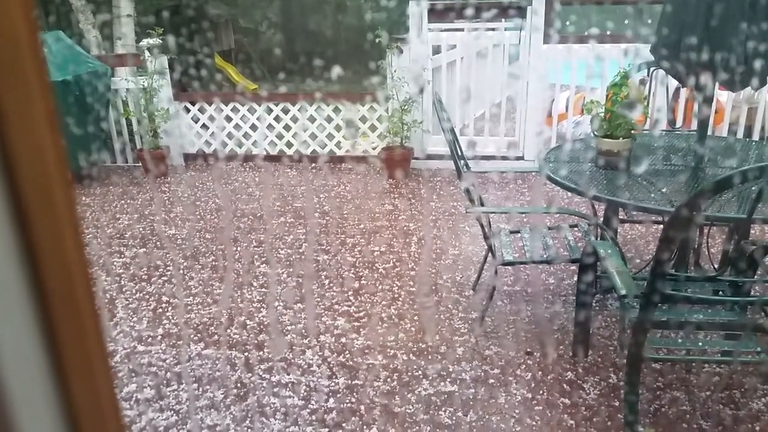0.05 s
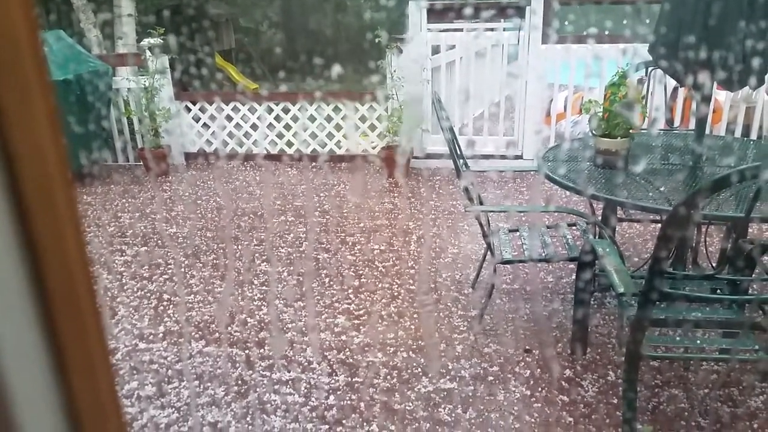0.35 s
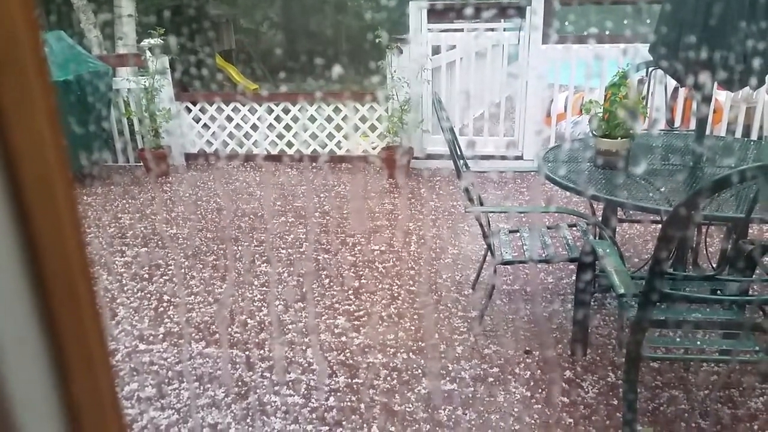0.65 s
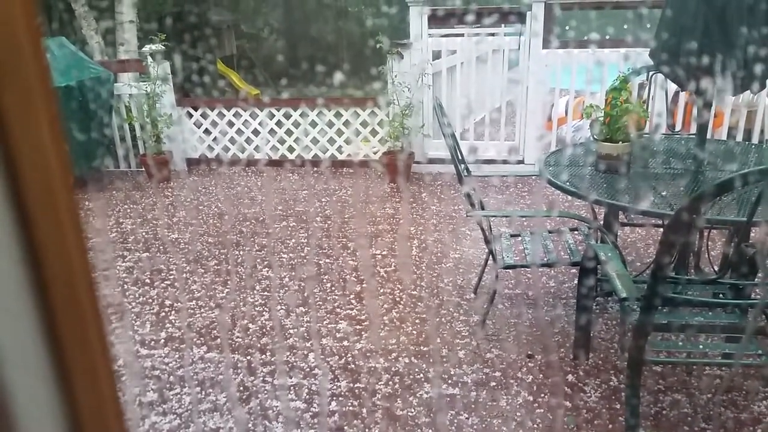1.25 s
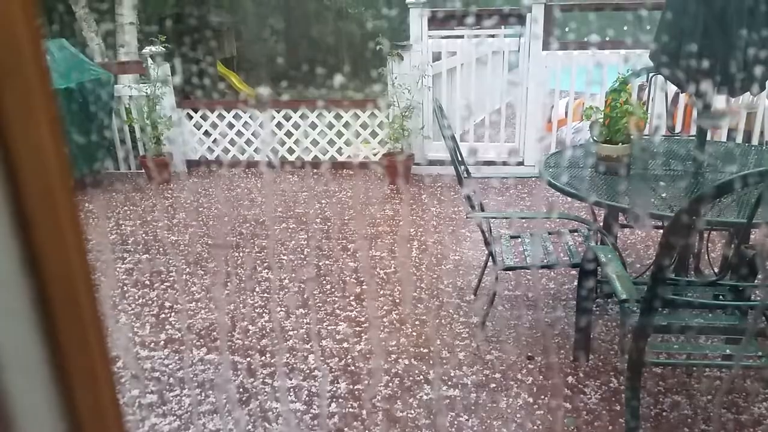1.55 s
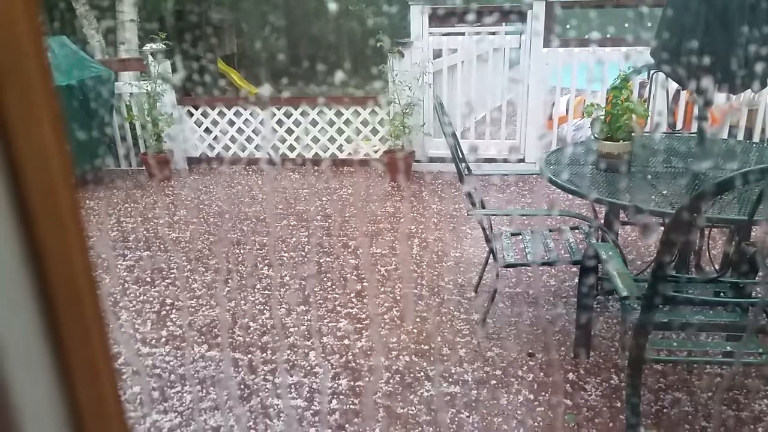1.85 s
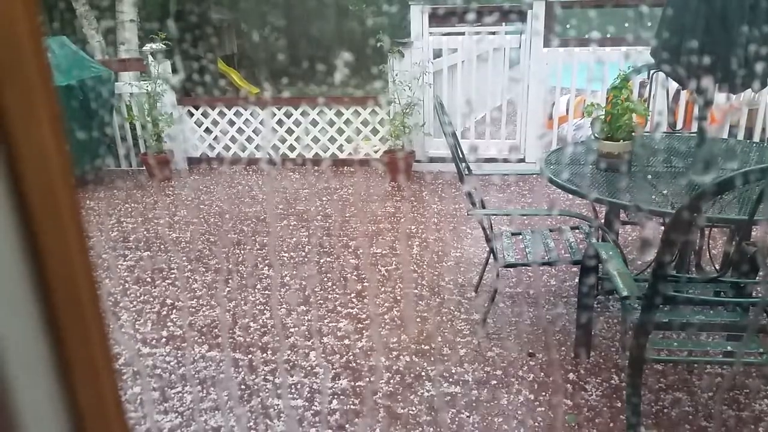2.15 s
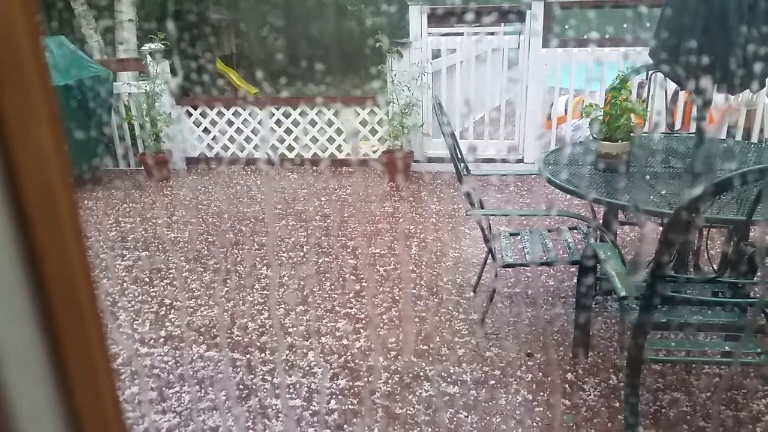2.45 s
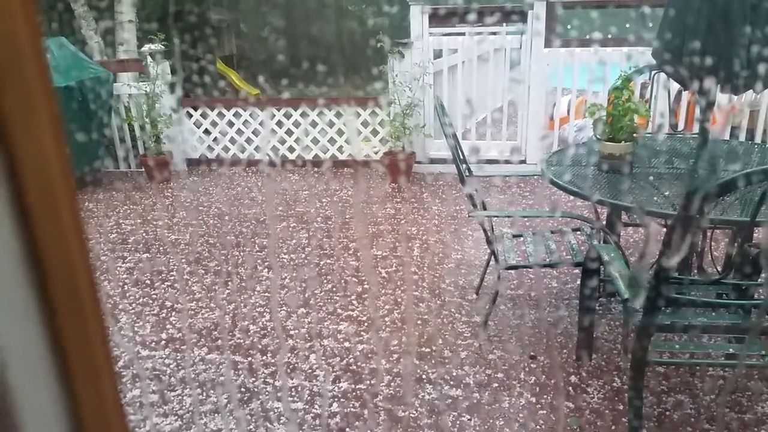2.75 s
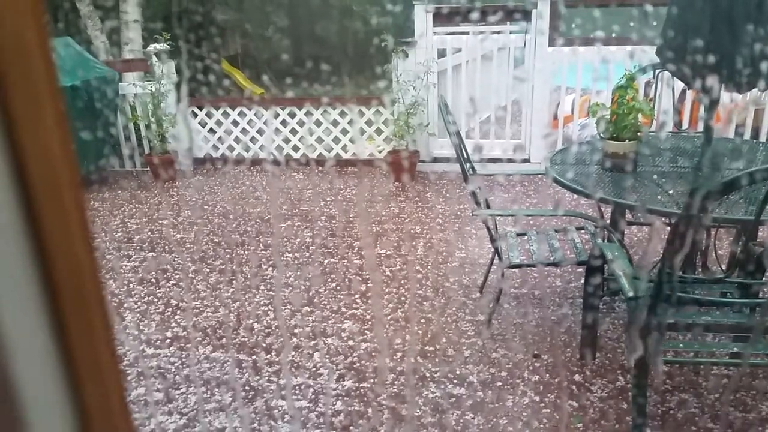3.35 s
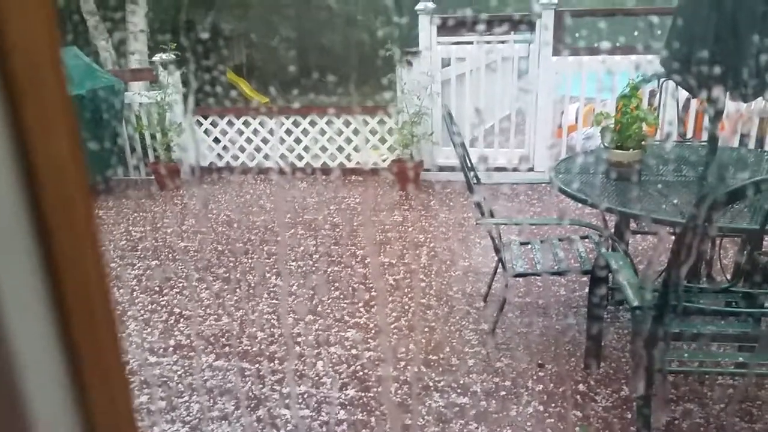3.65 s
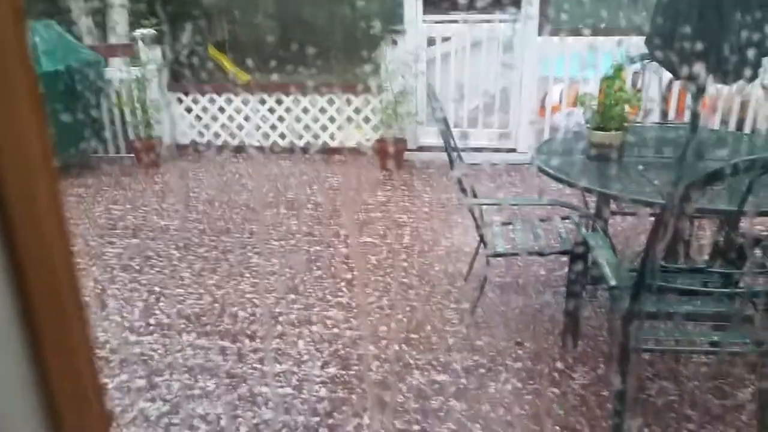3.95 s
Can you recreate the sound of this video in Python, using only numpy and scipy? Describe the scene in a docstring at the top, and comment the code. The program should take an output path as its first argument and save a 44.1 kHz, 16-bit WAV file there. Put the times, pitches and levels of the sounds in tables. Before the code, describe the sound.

Hail and rain pound a roof and deck, heard indoors behind a glass door. Heavy stones thump through a steady rumble while nearer ones clack on the wall and glass. The faintly hissing microphone is bumped at the end.

```python
"""Hail and rain beat on a house and its deck, heard from indoors behind a glass door.
Countless blows merge into a roof rumble and a muffled patter; heavy stones thump and ring the boards.
Nearer stones clack on the wall and glass, and a few knock on the wooden frame.
The microphone hisses, mostly on the left, and is bumped at the very end."""
import sys
import numpy as np
from scipy import signal
from scipy.fft import rfft, irfft
from scipy.io import wavfile
from scipy.ndimage import uniform_filter1d

SR = 44100
rng = np.random.default_rng(int(sys.argv[2]) if len(sys.argv) > 2 else 0)


def store_pcm(level_fs):
    """Save levels as 16-bit WAV."""
    pcm = np.round(np.clip(level_fs, -1, 1) * 32767).astype(np.int16)
    wavfile.write(sys.argv[1], SR, np.atleast_2d(pcm).T)


N = 176400  # 4 seconds

# Levels in the tables are relative. A "tone" says how strong each frequency is.
# tone of the left microphone's hiss: f/Hz, level/dB
HISS_TONE = [(1500, -40), (2400, -20), (2750, -14), (3100, -12.5), (3550, -3.5), (3850, -2), (4350, 0.5),
             (4700, -5), (5200, -14.5), (5900, -28), (6400, -48.5), (7200, -67)]
# tone of the bump on the microphone: f/Hz, level/dB
BUMP_TONE = [(20, -35), (60, -3), (110, 1.5), (170, -0.5), (260, -4), (350, -5.5), (500, -18), (700, -29),
             (1400, -41), (3000, -52), (6000, -79), (9000, -100)]
# strength of the shower over time: t/s, level/dB
SHOWER_STRENGTH = [(0, 0.5), (.36, 0.5), (.48, 3.5), (.66, 2), (.9, 0), (1.1, 1), (1.3, 0.5), (1.62, 0),
                   (1.76, 3), (1.9, -1), (2.2, 0), (2.6, -0.5), (2.8, .5), (3.02, -5.5), (3.14, 2),
                   (3.32, -0.5), (3.55, -4.5), (4, -4)]
# tone of the deck's patter through the glass: f/Hz, level/dB
PATTER_TONE = [(200, -9), (500, 3.5), (750, 3.5), (1000, -2.5), (1600, -7.5), (1900, -12.5), (2400, -19.5),
               (3200, -18), (4300, -21.5), (5300, -31), (6400, -48.5), (8000, -62.5)]
# stones hitting the wooden frame: t/s, level/dB
FRAME_HITS = [(2.403, -24.5), (2.432, -41), (2.881, -35)]
# notes at which the frame rings: f/Hz, level/dB, time to fade by 60 dB/s
FRAME_NOTES = [(850, -19, 0.027), (1216, -6, .022), (1330, -10, .025), (1520, -8, 0.012), (1593, 0, 0.024),
               (1840, -10, 0.017), (2540, -21, 0.017)]
# tone of a knock's echo in the room: f/Hz, level/dB
ECHO_TONE = [(400, -15), (850, -6), (1050, -9), (1250, 2), (1620, 0), (2000, -9), (2600, -21), (3500, -34),
             (7000, -82)]
# near hailstones: t/s, clack level/dB, crack level/dB, sizzle level/dB, time to fade by 60 dB/s
NEAR_HITS = [(.376, -53, -65, -65, 0.14), (.438, -45, -60, -71, 0.23), (.483, -56, -55, -75, .14),
             (.53, -56, -75, -83, 0.12), (.58, -52, -77, -84, 0.18), (0.646, -57, -68, -79, 0.092),
             (.707, -58, -62, -59, 0.11), (0.749, -46.5, -62.5, -60, 0.21), (0.952, -42, -49.5, -82, 0.12),
             (0.967, -42.5, -63, -85, 0.064), (1.03, -47, -60, -72, 0.22), (1.149, -50, -70, -88, 0.077),
             (1.488, -42, -65, -86, 0.051), (1.569, -49.5, -65, -71, 0.13), (1.68, -54, -67, -74, 0.36),
             (1.71, -48, -63.5, -68, 0.16), (1.755, -55, -63, -77, 0.37), (2.095, -44.5, -58.5, -62, 0.28),
             (2.167, -53, -70, -64, 0.069), (2.329, -63, -67, -67, .12), (2.684, -54, -64, -66, .11),
             (2.768, -46, -64, -77, 0.31), (2.848, -58, -62, -64, 0.12), (3.092, -50, -62, -75, .2),
             (3.118, -46.5, -75, -80, 0.17), (3.244, -53, -69, -75, .2), (3.29, -51, -69, -79, 0.37),
             (3.464, -51.5, -78, -82, 0.18)]
# tone of a stone's low clack: f/Hz, level/dB
CLACK_TONE = [(150, -13), (400, 6), (800, 2), (1300, -1.5), (1700, -6.5), (2200, -10.5), (3200, -27.5),
              (6000, -56), (9000, -84.5)]
# tone of its sharp crack: f/Hz, level/dB
CRACK_TONE = [(1000, -18.5), (2000, -0.5), (2700, 2.5), (3200, -7), (4100, -2.5), (5200, -13.5),
              (6400, -27.5), (8000, -42.5), (14000, -59)]
# tone of its high sizzle, and of the faint high hiss: f/Hz, level/dB
SIZZLE_TONE = [(3000, -42.5), (7000, -25.5), (9300, -23), (11200, -11), (13000, -4.5), (15500, -1.5)]
# heavy stones on the roof: t/s, thump level/dB, hollow ring level/dB
HEAVY_HITS = [(0.127, -26.5, -49.5), (0.158, -27.5, -45), (0.215, -24.5, -48), (0.26, -28, -48),
              (0.369, -29.5, -44), (0.443, -31.5, -40), (0.533, -27.5, -41), (0.579, -25.5, -41),
              (0.669, -28.5, -47), (0.779, -32, -41.5), (0.969, -26.5, -39), (1.031, -26.5, -42.5),
              (1.148, -29.5, -41), (1.22, -29.5, -47), (1.379, -38, -45.5), (1.519, -32, -44.5),
              (1.55, -33, -45), (1.676, -29, -44), (1.871, -32, -49), (1.939, -33, -41.5),
              (2.089, -28.5, -44.5), (2.187, -26.5, -49), (2.25, -32, -47.5), (2.385, -35, -51),
              (2.549, -30.5, -47), (2.76, -36.5, -46), (3.091, -24, -40), (3.119, -31, -44),
              (3.465, -28.5, -41.5), (3.589, -33, -49)]
# tone of the boards' hollow ring: f/Hz, level/dB
BOARD_TONE = [(120, -20.5), (240, -2), (400, 0.5), (560, -4.5), (800, -9), (1200, -23), (3000, -60.5),
              (7000, -90)]
# tone of the rumbling roof and walls: f/Hz, level/dB
ROOF_TONE = [(12, -40), (20, -17.5), (54, -4), (107, 1.5), (210, -7.5), (236, -6), (266, -10.5), (369, -10),
             (505, -17.5), (700, -24.5), (910, -50), (1540, -120)]
# notes that the room boosts: f/Hz, width/Hz, boost/dB
ROOM_NOTES = [(62, 10, 3.5), (104, 3.7, 1.5), (122, 8.6, 1.5), (158, 18, 4), (191, 8.2, 2), (218, 5.3, 2),
              (252, 12, 4), (296, 52, 3.5), (381.3, 20, 3.5), (750, 48, 4)]
# how the rumble leans to one side: f/Hz, left minus right level/dB
ROOF_LEAN = [(30, -4), (65, -2), (120, -4.5), (220, -6.5), (380, -7), (700, -4)]


def gain(db):
    """Turn decibels into a number to multiply by."""
    return 10 ** (np.asarray(db) / 20)


def set_level(x, db):
    """Scale a sound to an average (rms) level."""
    return x * gain(db) / np.sqrt(np.mean(x ** 2))


def pan(db):
    """Left and right gains; positive dB leans left, negative leans right."""
    return gain(np.array([[1], [-1]]) * db / 2)


def frequencies():
    """The frequencies, in Hz, at which a tone is worked out."""
    return np.maximum(np.arange(N + 1) * SR / (2 * N), 1)


def curve(points):
    """Join a table's points into one dB value for every frequency."""
    hz, db = np.array(points).T
    return np.interp(np.log(frequencies()), np.log(hz), db)


def colour(x, db):
    """Filter a sound by a dB curve, so that ringing follows each hit and never comes before it."""
    cepstrum = irfft(np.log(gain(db)))  # the curve, laid out along time
    cepstrum[..., 1:N] *= 2
    cepstrum[..., N + 1:] = 0  # drop the part before the hit
    response = np.exp(rfft(cepstrum))
    return irfft(rfft(x, 2 * N) * response)[..., :N]


def ring(start, rise_s, fade_s):
    """Loudness shape of one blow: a quick rise, and a fall of 60 dB in fade_s."""
    shape = np.zeros(N)
    first = int(np.clip(start * SR, 0, N))
    age = np.arange(min(N - first, SR // 2)) / SR
    shape[first:first + len(age)] = np.minimum(age / rise_s, 1) * np.exp(-np.log(1000) * age / fade_s)
    return shape


def burst(shape, tone):
    """Separate noise for each ear, given a loudness shape and then a tone of the same power."""
    db = curve(tone)
    noise = shape * rng.standard_normal((2, N))
    return colour(noise, db) / np.sqrt(np.mean(gain(db) ** 2))


def impacts(per_second, spread_db):
    """Randomly timed clicks of uneven size."""
    happens = rng.random(N) < per_second / SR
    size = gain(spread_db * np.clip(rng.standard_normal(N), -2, 2))
    return happens * size * rng.choice([-1, 1], N)


def shower(follow=1):
    """Gain that swells and eases with the hail; a smaller follow makes it swing less."""
    return gain(follow * np.interp(np.arange(N) / SR, *np.array(SHOWER_STRENGTH).T))


def microphone_hiss():
    """A steady hiss on the left, and a faint high hiss on both sides that follows the shower."""
    left = set_level(colour(rng.standard_normal(N), curve(HISS_TONE)), -50)
    high = set_level(colour(rng.standard_normal((2, N)), curve(SIZZLE_TONE)), -72.5)
    return left * np.array([[1], [0]]) + high * shower(follow=0.33) * pan(-1.2)


def microphone_bump(at_s=3.983, rub_s=0.01):
    """One soft thud on the microphone's housing, inside a brief rub."""
    click = np.zeros(N)
    click[int(at_s * SR)] = -1
    thud = colour(click, curve(BUMP_TONE))
    thud *= gain(-13) / np.abs(thud).max()
    rub_shape = gain(-31) * np.exp(-np.abs(np.arange(N) / SR - at_s) / rub_s)
    return (thud + burst(rub_shape, BUMP_TONE)) * pan(17)


def deck_patter():
    """Many small hits on the deck, muffled by the glass; each leaves a short, noisy tail."""
    hits = impacts(per_second=700, spread_db=4) * shower()
    tail_shape = ring(0, rise_s=0.002, fade_s=0.084)
    energy = np.abs(signal.fftconvolve(hits ** 2, tail_shape ** 2)[:N])
    tails = np.sqrt(energy) * rng.standard_normal((2, N))
    muffled = colour(set_level(tails, 0) + set_level(hits, -3), curve(PATTER_TONE))
    return set_level(muffled, -55) * pan(-5)


def frame_knocks(rise_s=0.0025, echo_db=-15):
    """A few stones make the wooden frame ring, and the room echoes."""
    t = np.arange(N) / SR
    wood = sum(gain(db + note_db) * ring(start, rise_s, fade_s) * np.sin(2 * np.pi * hz * (t - start))
               for start, db in FRAME_HITS for hz, note_db, fade_s in FRAME_NOTES)
    echo_shape = sum(gain(db + echo_db) * ring(start, rise_s, fade_s=0.12) for start, db in FRAME_HITS)
    return (wood / 2 + burst(echo_shape, ECHO_TONE)) * pan(-8.5)


def near_stones(rise_s=0.0021, rough_db=1):
    """Near stones shatter on wall and glass: a clack, a crack and a sizzle of splinters."""
    flicker = set_level(uniform_filter1d(rng.standard_normal(N), size=90), 0)
    roughness = set_level(gain(rough_db * flicker), -2)
    sound = 0
    for part, (tone, lean_db) in enumerate([(CLACK_TONE, -10), (CRACK_TONE, -10), (SIZZLE_TONE, -11)]):
        shape = sum(gain(levels[part]) * ring(start, rise_s, fade_s)
                    for start, *levels, fade_s in NEAR_HITS)
        sound = sound + burst(shape * roughness, tone) * pan(lean_db)
    return sound


def hollow_boards():
    """Each heavy stone leaves a short, hollow ring in the boards."""
    shape = sum(gain(db - 3) * ring(start, rise_s=0.0027, fade_s=0.14) for start, _, db in HEAVY_HITS)
    return burst(shape, BOARD_TONE)[0] * pan(-6)


def hail_on_roof(per_second=1100, spread_db=2, dull_above_hz=632):
    """Dull blows on roof and walls merge into a rumble that rings the room; heavy ones stand out."""
    shared_blows = set_level(impacts(per_second, spread_db), 0)  # the same in both ears
    side_blows = set_level(np.array([impacts(per_second, spread_db) for _ in range(2)]), -11.5)
    f = frequencies()
    room_db = sum(boost / (1 + (2 * (f - hz) / width) ** 2) for hz, width, boost in ROOM_NOTES)
    treble_cut_db = 10 * np.log10(1 + (f / dull_above_hz) ** 8)
    lean_db = np.array([[1], [-1]]) * curve(ROOF_LEAN) / 2
    tone_db = curve(ROOF_TONE) + room_db - treble_cut_db + lean_db
    rumble = colour(shared_blows + side_blows, tone_db) * shower(follow=0.38)
    heavy_blows = sum(gain(db) * (np.arange(N) == int(start * SR)) for start, db, _ in HEAVY_HITS)
    thumps = colour(heavy_blows, tone_db)
    thumps *= heavy_blows.max() * gain(-1) / np.abs(thumps).max()
    return set_level(rumble, -39.5) + thumps


def scene():
    """Everything as heard just inside the door."""
    hail = hail_on_roof() + deck_patter() + near_stones() + frame_knocks()
    return hail + microphone_hiss() + microphone_bump() + hollow_boards()


def record(dry):
    """Cut off the highest treble, above 15800 Hz."""
    return signal.sosfilt(signal.ellip(10, .2, 70, 15800, fs=SR, output="sos"), dry)


dry = scene()
out = record(dry)
store_pcm(out)
```